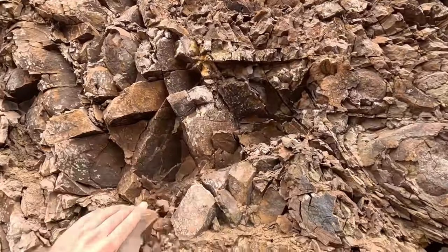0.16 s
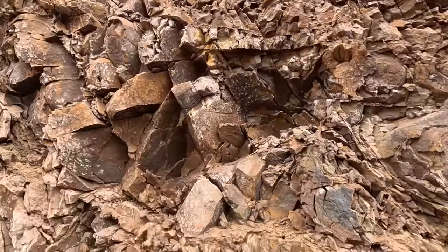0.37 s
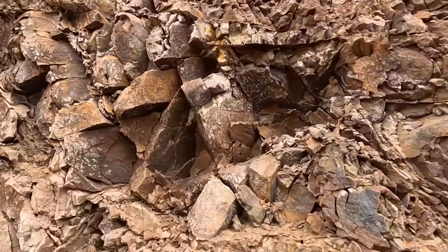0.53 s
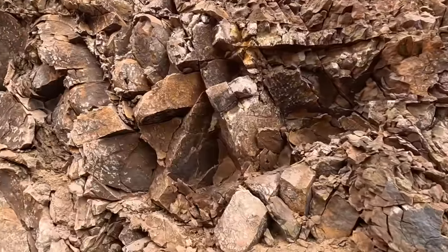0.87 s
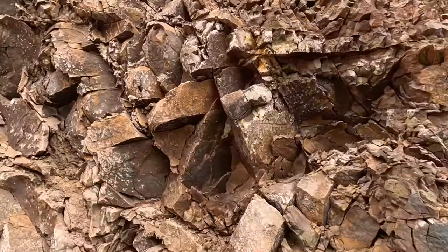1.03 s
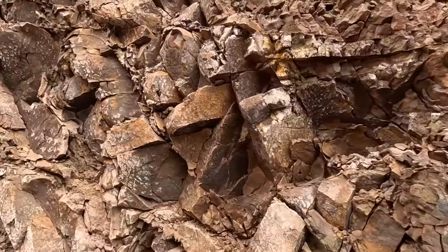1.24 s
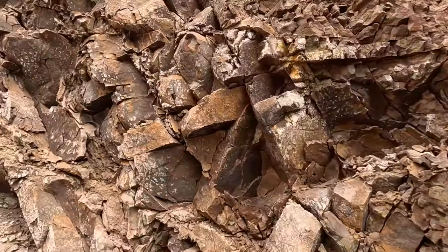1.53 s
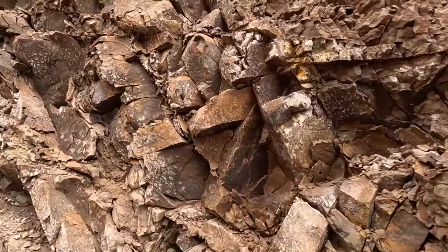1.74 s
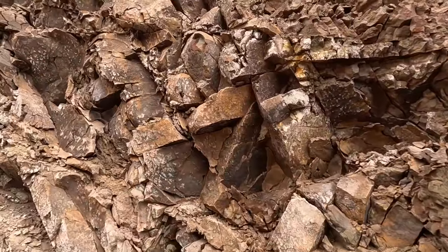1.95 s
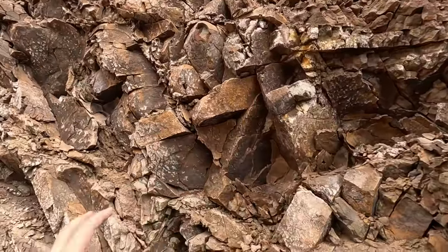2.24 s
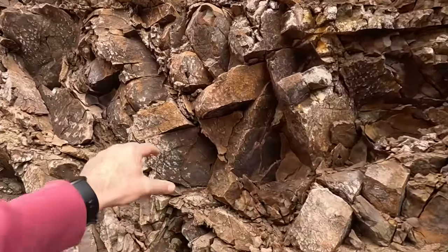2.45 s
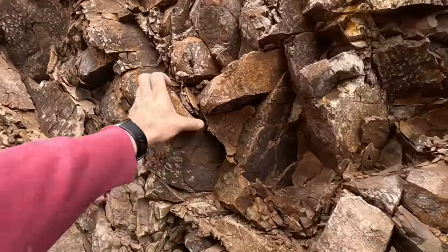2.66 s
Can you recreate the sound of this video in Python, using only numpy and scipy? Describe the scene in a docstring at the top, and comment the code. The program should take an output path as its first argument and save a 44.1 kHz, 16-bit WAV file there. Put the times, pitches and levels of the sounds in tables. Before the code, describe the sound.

Loose rock clatters down a rock face, close up outdoors. Cracking chips and scraping begin at once; from 0.2 seconds a bright gritty pour rushes with hollow knocks, densest around 0.5-0.8 with low heavy thuds. It thins after 1.1 to separate ticks until about 2.2. A hand brushes and scuffs stone from 2.4, strongest near 2.6, with dull handling bumps. Soft low wind buffets throughout.

```python
"""Loose flakes of rock break from a face and pour down a slope: a rush of short noise grains over a hiss of dust.
Chips crack from the start, joined by rough hollow knocks and low swinging jolts of the hand-held camera.
Heavier lumps then thud on the ground as low swings that sag in pitch, over a rumble of small soft landings.
The pour dies away and the last chips tick down one by one; near the end a hand scuffs and brushes the rock.
Lumpy low wind and quiet outdoor air, both shaped from noise, run throughout."""
import sys
import numpy as np
from scipy import signal
from scipy.fft import rfft, irfft, next_fast_len
from scipy.io import wavfile
from scipy.ndimage import uniform_filter1d

SR = 44100
rng = np.random.default_rng(int(sys.argv[2]) if len(sys.argv) > 2 else 0)


def master_out(mix):
    """Clip the mix to full scale and print it as 16-bit PCM to the path in sys.argv[1]."""
    frames = np.transpose(np.atleast_2d(mix))
    ceiling = np.clip(frames, -1, 1)
    pcm = np.round(ceiling * 32767).astype(np.int16)
    wavfile.write(sys.argv[1], SR, pcm)


N = 123479  # length in samples, about 2.8 s

# How loud the gravel pour is. Each row: time in seconds, level in dB.
POUR_LEVEL = [(0, -34.5), (.15, -38), (.185, -35.5), (.225, -26.5), (.255, -37.5), (.31, -27.5),
              (.45, -27.5), (.52, -28), (.6, -25.5), (.69, -24), (.78, -30.5), (.9, -28.5), (.985, -32),
              (1.02, -29), (1.09, -35.5), (1.21, -37.5), (1.3, -40.5), (1.45, -49.5), (1.75, -52.5),
              (1.87, -56), (1.93, -48.5), (2.02, -58.5), (2.4, -67)]
# Colour of gravel, chips and brushing hand. Each row: frequency in Hz, strength in dB per Hz.
GRIT_COLOUR = [(530, -8), (900, -17.5), (1720, -9), (5220, -5), (7770, -6), (12700, -19), (16000, -29.5)]
# Seven sizes of grit, from large to small. Each value: pitch in Hz.
GRAIN_PITCHES = np.geomspace(2100, 9000, num=7)
# Chips striking stone. Each row: start in seconds, strength in dB before colouring, pitch in Hz.
CHIP_HITS = [(0.0491, -12.5, 3130), (0.0954, -15, 3120), (0.189, -12.5, 5950), (0.2293, -14, 6270),
             (0.3516, -15, 8050), (0.386, -5, 4630), (0.433, -10, 5560), (0.452, -11.5, 4560),
             (0.4641, -14.5, 3550), (0.5532, -12, 2630), (0.567, -4, 2940), (0.576, -7, 2300),
             (0.592, -9.5, 2150), (0.6148, -12, 5600), (0.7245, -7.5, 2620), (0.7411, -4.5, 4300),
             (0.8217, -16.5, 4450), (0.866, -15, 6500), (0.9501, -12, 5100), (1.008, -5.5, 6200),
             (1.053, -14, 6750), (1.1175, -5.5, 5900), (1.1222, -10, 5300), (1.1877, -6, 4330),
             (1.205, -8, 7400), (1.2438, -15.5, 8200), (1.2836, -17, 9700), (1.4017, -26, 4130),
             (1.4294, -21, 5700), (1.447, -21, 5430), (1.5439, -23.5, 8500), (1.575, -26, 3540),
             (1.5812, -12, 3630), (1.6281, -12.5, 3560), (1.6465, -25.5, 5800), (1.696, -27.5, 8900),
             (1.7167, -28, 7060), (1.7639, -14, 7300), (1.8036, -24, 7300), (1.8206, -18, 7600),
             (1.8904, -22, 5540), (1.8996, -10.5, 6670), (1.924, -19, 5400), (1.957, -34, 6500),
             (1.993, -22, 2530), (2.1503, -24.5, 5800), (2.2568, -28, 7850)]
# Hollow knocks of fist-sized pieces. Each row: start in seconds, strength in dB, starting pitch in Hz.
KNOCK_HITS = [(0.226, -18.5, 1510), (0.237, -20.5, 950), (0.319, -24, 830), (0.35, -16.5, 1200),
              (0.526, -17, 614), (0.553, -21, 540), (0.591, -15, 587), (0.681, -21.5, 1580),
              (0.723, -18.5, 1330), (1.186, -29.5, 1180), (1.582, -29, 577), (1.629, -34, 610),
              (1.647, -36, 640), (1.671, -44.5, 960), (1.893, -31, 1210), (2.589, -31, 934),
              (2.636, -34, 1090), (2.766, -32.5, 646)]
# Lumps landing on the ground. Each row: start in seconds, strength in dB, starting pitch in Hz.
THUD_HITS = [(0.369, -23.5, 98), (0.529, -19, 121), (0.558, -14, 108), (0.578, -11.5, 184),
             (0.594, -15.5, 130), (0.661, -14.5, 78), (0.691, -10.5, 92), (0.712, -19.5, 69),
             (.749, -12.5, 146), (0.764, -22.5, 70.5), (0.955, -26, 117), (1.585, -24, 164),
             (1.898, -31, 340)]
# Jolts of the camera body. Each row: start in seconds, strength in dB, starting pitch in Hz,
# signed multiplier (plus for a push, minus for a pull).
JOLT_HITS = [(.170, -17.5, 125, -1.06), (.221, -20.5, 91, 0.76), (.345, -19, 101, 0.82),
             (1.311, -27, 82, 0.91), (1.425, -28, 45, -1.04), (1.945, -29.5, 69.5, 0.95),
             (1.975, -16, 154, 0.76), (2.159, -29.5, 112, 1), (2.275, -21, 77.5, -1.2),
             (2.640, -14.5, 151, 1), (2.651, -22, 56, -1.55), (2.675, -19, 59, 0.9),
             (2.768, -15, 135, -0.87)]
# Ground rumble under the tumbling rock. Each row: time in seconds, level in dB.
RUMBLE_LEVEL = [(0, -44.5), (.16, -48.5), (.4, -44), (.5, -53.5), (.6, -37), (.75, -36.5), (1.05, -43.5),
                (1.3, -50.5), (1.8, -53.5), (2.37, -57), (2.41, -53), (2.49, -51), (2.52, -42.5),
                (2.61, -39), (2.7, -49.5), (2.8, -47.5)]
# Colour of the rumble. Each row: frequency in Hz, strength in dB per Hz.
RUMBLE_COLOUR = [(40, -34), (100, 0), (250, -5), (500, -19.5), (800, -18), (1500, -49)]
# Scraping of rock on rock and of the hand. Each row: time in seconds, level in dB.
SCUFF_LEVEL = [(0, -41), (.25, -36.5), (.7, -45.5), (1.4, -57), (1.8, -52.5), (2.1, -61), (2.395, -68),
               (2.405, -53), (2.46, -59.5), (2.52, -48), (2.56, -50), (2.59, -35), (2.65, -52),
               (2.8, -51.5)]
# Colour of the scraping. Each row: frequency in Hz, strength in dB per Hz.
SCUFF_COLOUR = [(400, -8.5), (700, -7.5), (1000, 2), (1400, -3.5), (2500, -10), (6000, -15.5),
                (10000, -27.5), (16000, -70)]
# Sleeve and palm brushing past the rock. Each row: time in seconds, level in dB.
BRUSH_LEVEL = [(2.395, -90), (2.405, -49.5), (2.45, -56), (2.57, -63), (2.595, -55), (2.74, -72),
               (2.765, -50.5), (2.8, -69)]
# Colour of wind on the microphone. Each row: frequency in Hz, strength in dB per Hz.
WIND_COLOUR = [(20, 4.5), (35, 6), (70, 0), (140, -10.5), (300, -51)]
# Colour of the quiet outdoor air. Each row: frequency in Hz, strength in dB per Hz.
AIR_COLOUR = [(200, -1), (400, -10), (1100, 8), (2500, 0), (8000, -16.5), (16000, -49)]
# How alike the two sides are. Each row: frequency in Hz, likeness from 0 (unrelated) to 1 (same).
SIDE_LIKENESS = [(60, 1), (400, 0.92), (2500, 0.63), (7000, 0.88), (14000, 0.12)]
# Which side is stronger. Each row: frequency in Hz, left minus right in dB.
SIDE_LEAN = [(60, -0.5), (240, 0.5), (950, 3.5), (3770, 3.5), (15000, 6.5)]

# Gravel: grains of all sizes together at the height of the pour, before clumping
GRAINS_PER_S, GRAIN_SPREAD_DB, GRAIN_DECAY_S, CLUMP_DB = 1400, 4.5, 0.0006, 2
THIN = 0.5  # dB of grain rate lost per dB of pour level
DUST_DB = -0.5  # against the grains at the height of the pour
COLOUR_OCTAVES, COLOUR_DB = 0.51, 5.5  # width and height of the hump round a pitch
# Chips: the ring's cycles are counted down to -60 dB
CHIP_RISE_S, CHIP_DECAY_S, CHIP_TAIL_S, CHIP_TAIL_DB = 0.00022, 0.00071, 0.0075, -14.5
CHIP_RING_CYCLES, CHIP_RING_DB = 19.7, -8.5
# Knocks: seconds to fall 60 dB, roughness, pitch sag per second (pitch is divided by 1 + sag * time)
KNOCK_T60_S, KNOCK_ROUGH, KNOCK_SAG = 0.027, 3.7, 58.8
# Thuds and jolts: decay counted in cycles of the starting pitch, sag per cycle
THUD_CYCLES, JOLT_CYCLES, SAG = 0.73, 0.73, 0.18
JOLT_PAN_DB, WIND_PAN_DB, KNOCK_PAN_DB = -7.5, -3.5, 2.5  # left minus right
WIND_DB, AIR_DB = -47.5, -62.5
CUTOFF_HZ = 16300


def amp(db):
    """Turn dB into a plain multiplier."""
    return 10 ** (np.asarray(db) / 20)


def rms_one(x):
    """Scale to an average strength (rms) of 1."""
    return x / np.sqrt(np.mean(x ** 2) + 1e-20)


def in_time(rows):
    """Read a level table at every sample."""
    return np.interp(np.arange(N) / SR, *np.transpose(rows))


def at_hz(points, hz):
    """Read a frequency table, with pitch spaced as the ear hears it (log scale)."""
    points = np.array(points)
    return np.interp(np.log(hz), np.log(points[:, 0]), points[:, 1])


def drift(rate_hz):
    """A slow random wander of spread 1: noise smoothed twice, worked out every 40 samples."""
    r = np.exp(-80 * np.pi * rate_hz / SR)
    noise = rng.standard_normal(N // 40 + 2002)
    slow = signal.lfilter([1], [1, -2 * r, r * r], noise)[2000:]  # drop the settling start
    return np.interp(np.arange(N) / 40, np.arange(len(slow)), rms_one(slow))


def die(clicks, decay_s):
    """Each click leaves an envelope that dies away exponentially."""
    return signal.lfilter([1], [1, -np.exp(-1 / (decay_s * SR))], clicks + 1e-18)


def grains(per_s, spread_db, decay_s):
    """Envelope of short bursts at random times and of uneven size."""
    sizes = amp(spread_db * np.minimum(rng.exponential(1, N), 3.3))
    starts = rng.random(N) < per_s / SR
    return die(sizes * starts, decay_s)


def hump(x, hz):
    """Lift a broad hump of frequencies round a pitch and lower the rest."""
    size = x.shape[-1]
    f = np.maximum(np.arange(size // 2 + 1) * SR / size, 5)
    octaves_away = np.log2(f / hz)
    lift_db = COLOUR_DB * (np.exp(-0.5 * (octaves_away / COLOUR_OCTAVES) ** 2) - 0.5)
    return irfft(rfft(x) * amp(lift_db), size)


def coloured(pair, spectrum):
    """Colour two signals and blend them into left and right with the slope's likeness and lean."""
    size = next_fast_len(N + 4096)
    hz = np.maximum(np.arange(size // 2 + 1) * SR / size, 5)
    alike = np.clip(at_hz(SIDE_LIKENESS, hz), 0, 1)
    mid, side = rfft(pair, size) * amp(at_hz(spectrum, hz))
    sign = np.array([[1], [-1]])  # left, right
    both = np.sqrt(1 + alike) * mid + sign * np.sqrt(1 - alike) * side
    both = both * amp(sign * at_hz(SIDE_LEAN, hz) / 2)
    return irfft(both, size)[:, :N]


def panned(x, pan_db):
    """Make left stronger than right by this many dB."""
    return x * amp([[pan_db / 2], [-pan_db / 2]])


def gravel():
    """Clumped noise grains of several sizes over dust hiss; both thin out as the pour dies."""
    level_db = in_time(POUR_LEVEL)
    clumps = amp(CLUMP_DB * (drift(9.6) + drift(50)))
    thinning = amp(THIN * (level_db - level_db.max()))
    rate = GRAINS_PER_S / len(GRAIN_PITCHES) * clumps * thinning
    size = next_fast_len(N)
    bursts = np.zeros((2, N))
    for hz in GRAIN_PITCHES:
        one_size = grains(rate, GRAIN_SPREAD_DB, GRAIN_DECAY_S) * rng.standard_normal((2, N))
        padded = np.pad(one_size, ((0, 0), (0, size - N)))
        bursts += hump(padded, hz)[:, :N]
    # fewer grains are weaker overall: undo that, as the level table sets the loudness
    steady_bursts = rms_one(bursts / np.sqrt(thinning))
    dust = amp(DUST_DB) * clumps * np.sqrt(thinning) * rng.standard_normal((2, N))
    return amp(level_db) * rms_one(coloured(steady_bursts + dust, GRIT_COLOUR))


def chips():
    """Each chip: a sharp noise crack, a few short rings near its pitch and a gritty tail."""
    out, t = np.zeros((2, N + SR)), np.arange(2048) / SR
    for s, db, hz in CHIP_HITS:
        noise = rng.standard_normal((2, len(t)))
        ring_hz = hz * np.exp(np.r_[0, rng.normal(0, 0.35, 3)])[:, None]
        grit = amp(3.5 * np.repeat(rng.standard_normal(32), 64))  # uneven after-skitter
        tail = amp(CHIP_TAIL_DB) * grit * np.exp(-t / CHIP_TAIL_S)
        crack = noise * (np.exp(-t / CHIP_DECAY_S) + tail)
        crack = crack * (1 - np.exp(-t / CHIP_RISE_S))
        ring_fade = amp(-60 * t * ring_hz / CHIP_RING_CYCLES)
        ring = np.sum(np.sin(2 * np.pi * ring_hz * t) * ring_fade, axis=0)
        middle_only = [[1], [0]]  # the ring goes into the part both sides share
        hit = hump(crack, hz) + amp(CHIP_RING_DB) * ring * middle_only
        start = int(s * SR)
        out[:, start:start + len(t)] += amp(db) * hit
    return coloured(out[:, :N], GRIT_COLOUR)


def knocks():
    """A short rough ring at the piece's pitch and one overtone, sagging as the piece beds in."""
    out, t = np.zeros(N + SR), np.arange(3000) / SR
    for s, db, hz in KNOCK_HITS:
        rough = 1 + KNOCK_ROUGH * uniform_filter1d(rng.standard_normal(len(t)), size=40)
        turns = hz * np.log1p(KNOCK_SAG * t) / KNOCK_SAG
        ring = np.sin(2 * np.pi * turns) + 0.35 * np.sin(2 * np.pi * 1.8 * turns)
        rise = 1 - np.exp(-t / 0.00083)
        start = int(s * SR)
        out[start:start + len(t)] += amp(db - 60 * t / KNOCK_T60_S) * ring * rough * rise
    return panned(out[:N], KNOCK_PAN_DB)


def bumps(rows, cycles):
    """A low push that swings back and dies, sagging in pitch."""
    out, t = np.zeros(N + SR), np.arange(6000) / SR
    for s, db, hz, way in rows:
        turns = hz * t / np.sqrt(1 + SAG * hz * t)
        envelope = np.exp(-hz * t / cycles) * (1 - np.exp(-12 * hz * t))
        start = int(s * SR)
        out[start:start + len(t)] += way * amp(db) * np.sin(2 * np.pi * turns) * envelope
    return out[:N]


def thuds():
    """Lumps landing on the ground: low pushes, equal on both sides."""
    return bumps([(*row, 1) for row in THUD_HITS], THUD_CYCLES)


def jolts():
    """The camera body is pushed or pulled: low swings, stronger on the right."""
    return panned(bumps(JOLT_HITS, JOLT_CYCLES), JOLT_PAN_DB)


def rumble():
    """Many small soft landings: low-coloured noise grains."""
    lumps = grains(400, spread_db=3.0, decay_s=0.004) * rng.standard_normal((2, N))
    return amp(in_time(RUMBLE_LEVEL)) * rms_one(coloured(lumps, RUMBLE_COLOUR))


def scuff():
    """Rock and hand drag in dull noise grains, strongest near 1 kHz, coming in lumps."""
    lumps = amp(2.5 * drift(25))
    rubs = lumps * grains(800, spread_db=3.5, decay_s=0.002) * rng.standard_normal((2, N))
    return amp(in_time(SCUFF_LEVEL)) * rms_one(coloured(rubs, SCUFF_COLOUR))


def brush():
    """Sleeve and palm rustle in fine, even noise grains, a little duller than the grit."""
    rubs = grains(3000, spread_db=2.5, decay_s=0.0015) * rng.standard_normal((2, N))
    duller = signal.lfilter([1], [1, -0.55], coloured(rubs, GRIT_COLOUR))
    return amp(in_time(BRUSH_LEVEL)) * rms_one(duller)


def wind():
    """Lumpy low buffeting on the microphone: slowly swelling noise, stronger on the right."""
    gusts = amp(3.5 * drift(6)) * rng.standard_normal((2, N))
    return panned(amp(WIND_DB) * rms_one(coloured(gusts, WIND_COLOUR)), WIND_PAN_DB)


def air():
    """Quiet outdoor air: steady coloured noise."""
    return amp(AIR_DB) * rms_one(coloured(rng.standard_normal((2, N)), AIR_COLOUR))


def scene():
    """Add the falling rock, camera jolts, hand, wind and air."""
    rock = gravel() + chips() + knocks() + thuds() + rumble()
    return rock + jolts() + scuff() + brush() + wind() + air()


def record(dry):
    """Round off the peaks and cut the top of the treble."""
    rounded = 0.65 * np.tanh(dry / 0.65)
    low_pass = signal.cheby2(12, 70, CUTOFF_HZ, fs=SR, output="sos")  # 70 dB down from the cutoff up
    return signal.sosfilt(low_pass, rounded)


dry = scene()
out = record(dry)
master_out(out)
```